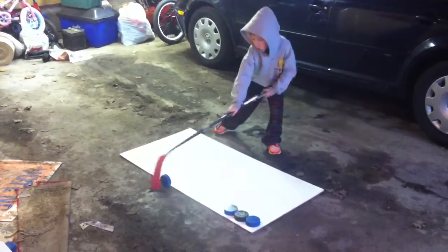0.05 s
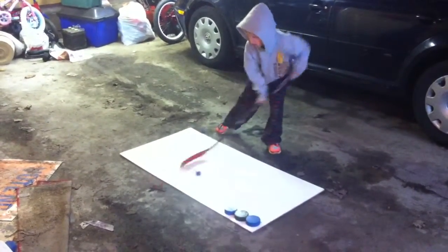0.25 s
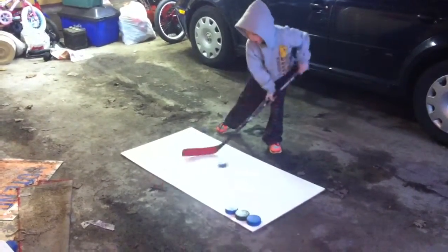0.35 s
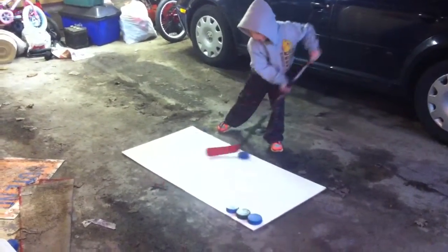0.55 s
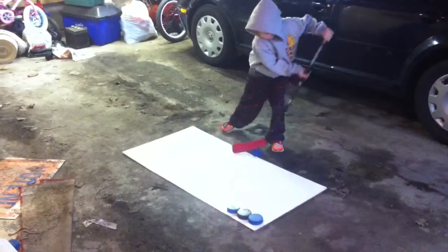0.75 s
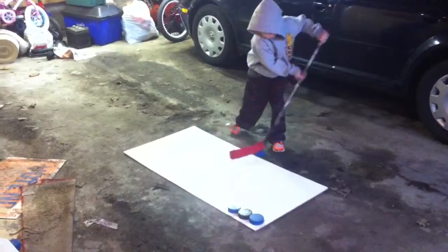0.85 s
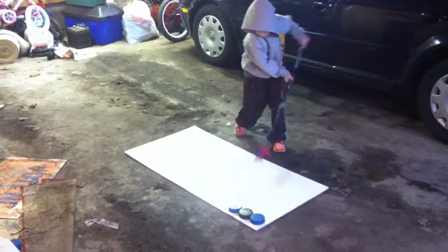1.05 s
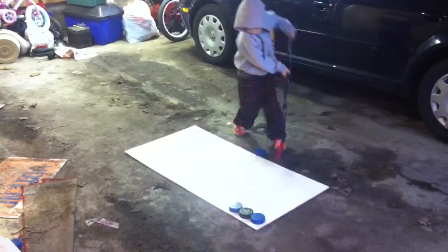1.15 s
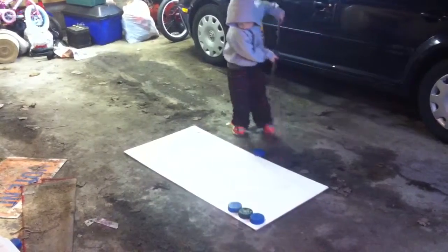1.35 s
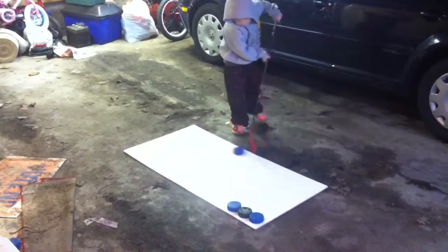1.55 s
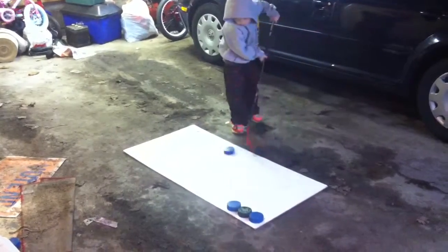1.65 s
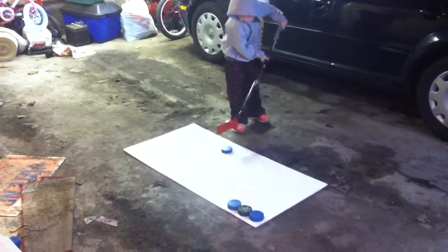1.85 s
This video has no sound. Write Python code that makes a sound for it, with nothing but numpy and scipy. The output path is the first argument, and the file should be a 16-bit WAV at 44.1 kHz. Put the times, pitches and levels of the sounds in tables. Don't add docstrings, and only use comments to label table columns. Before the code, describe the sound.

A hockey stick smacks a puck on a plastic board with a loud double crack and garage echo, shoes shuffle on grit, then a brief scrape and duller knocks; thin, hissy small microphone.

```python
import sys
import numpy as np
from scipy import signal
from scipy.fft import rfft, irfft
from scipy.io import wavfile

SR = 44100
rng = np.random.default_rng(int(sys.argv[2]) if len(sys.argv) > 2 else 0)


def volts(x):
    e = np.asarray(x, float) / 20
    return 10 ** e


def store_pcm(level_fs):
    pcm = np.round(np.clip(level_fs, -1, 1) * 32767).astype(np.int16)
    wavfile.write(sys.argv[1], SR, np.atleast_2d(pcm).T)


N = 83790

# (frequency [Hz], density [dB per Hz])
HISS_COLOUR = [(240, -62), (400, -18.5), (446, -15), (528, -20.5), (879, -14.5), (1060, -14.5),
               (16000, -38.5)]
# (frequency [Hz], density [dB per Hz])
DRONE_COLOUR = [(15, -62), (30, -26), (97, -14), (146, -2), (178, -5), (211, 3), (237, -12), (282, -4),
                (400, -23), (520, -52), (880, -120)]
# (frequency [Hz], time to fall 60 dB [s])
GARAGE_DECAY = [(200, 0.42), (600, .75), (1200, 0.54), (2500, 0.54), (5000, 0.51), (9000, 0.54),
                (14000, 0.17)]
# (time [s], level [dB], extra treble [dB])
SHUFFLE_MOVES = [(0.36, -54, -13), (0.508, -52, -10), (0.662, -55, -14), (0.674, -48.5, -13.5),
                 (0.76, -58, -3), (.86, -58, 3), (.93, -53, 6), (1.034, -49, 5), (1.13, -54, 4),
                 (1.188, -57, -1), (1.216, -55, 1), (1.252, -59.5, -2.5), (1.286, -48.5, 0.5),
                 (1.336, -48.5, -7), (1.358, -43, -5), (1.466, -59, -21), (1.47, -68, 12), (1.64, -66, 0),
                 (1.655, -49, 0), (1.7, -52, 3), (1.725, -51, 6), (1.76, -57, 0), (1.9, -66, -5)]
# (frequency [Hz], density [dB per Hz])
SHUFFLE_COLOUR = [(530, -29), (900, -14), (1390, -16.5), (1790, -9.5), (1950, -9.5), (3300, -7),
                  (4520, -11.5), (10800, -9), (16000, -14.5)]
# (time [s], level [dB])
SKID_LEVEL = [(.38, -70), (.41, -52), (.5, -56), (.6, -49), (.65, -52), (.75, -53.5), (.8, -57), (.85, -54),
              (.92, -70), (1.02, -72), (1.1, -120), (1.46, -120), (1.49, -50), (1.53, -48), (1.6, -59),
              (1.68, -50), (1.72, -51), (1.8, -51), (1.9, -60)]
# (time [s], peak level [dB])
GRIT_FLICKS = [(.8115, -39), (1.6367, -32), (1.6775, -30), (1.7035, -23), (1.7068, -24), (1.712, -33),
               (1.7222, -19), (1.7245, -29), (1.727, -32), (1.733, -32), (1.852, -43)]
# (time [s], level [dB], pitch [Hz])
SOFT_BUMPS = [(.2785, -4, 827), (.2945, -8.5, 880), (.3015, -14, 800), (.3095, -16, 800),
              (.292, -17, 1500), (.3365, -20, 700), (.262, -24, 850), (.324, -12, 1600),
              (1.6227, -41, 9000), (1.6482, -33, 9100), (1.664, -18, 800), (1.4805, -32, 2030),
              (1.488, -33, 2020), (1.483, -35, 2950), (1.49, -36, 2500), (1.496, -36, 3050),
              (1.498, -34, 650), (1.511, -38, 1300), (1.525, -37, 1050), (1.535, -34, 720),
              (1.544, -35, 760), (1.483, -34, 2010), (0.48, -36, 166), (1.77, -36, 580),
              (1.6535, -19, 1980), (1.216, -45.5, 1980), (.364, -14, 840), (.472, -20.5, 670),
              (.511, -33, 780), (.612, -42, 1120), (.635, -39, 800), (.648, -41, 1000), (.668, -41, 900),
              (.703, -41, 825), (.735, -42, 800), (.826, -38, 760), (.833, -43, 700), (.842, -32, 660),
              (0.847, -45, 1420), (.897, -41.5, 600), (1.338, -43, 600), (1.338, -43, 380),
              (1.339, -47, 220), (1.036, -50, 3300), (1.044, -49, 3500), (1.655, -20, 680),
              (1.803, -27, 810), (1.842, -34, 720), (1.724, -27, 780), (1.706, -29, 600), (1.5, -39, 380),
              (1.535, -40, 400), (1.495, -30, 2020), (1.66, -17, 2070)]
# (time [s], level [dB])
DRAG_LEVEL = [(.186, -50), (.19, -24.5), (.205, -39.5), (.25, -37), (.27, -59), (.3, -120), (1.45, -120),
              (1.465, -64), (1.472, -44.5), (1.485, -34), (1.5, -44), (1.54, -41.5), (1.58, -64),
              (1.64, -53), (1.7, -85)]
# (frequency [Hz], density [dB per Hz])
BLADE_GRIT_COLOUR = [(240, -39), (400, -6), (636, -9), (1040, -4.5), (1840, 2.5), (3370, -2), (6540, -8),
                     (13500, -12.5), (16000, -26)]
# (time [s], level [dB])
BLADE_SING = [
    (.18, -14.5),
    (1.46, -13),
    (1.475, -4.5),
    (1.5, -1),
    (1.52, -9),
    (1.58, -12),
    (1.7, -14),
]
# (frequency [Hz], level [dB], time to fall 60 dB [s])
BOARD_MODES = [(187, -29, 0.12), (353, -34, 0.013), (540, -8, 0.063), (691, -3, 0.026), (752.5, -3.5, 0.04),
               (833.5, -4.5, 0.056), (880, -6.5, 0.053), (1167, -10, 0.029)]
# (frequency [Hz], level [dB], time to fall 60 dB [s])
BLADE_MODES = [(1423, 0, 0.017), (1530, -5, 0.011), (1782, 3, 0.014), (2100, 2.5, 0.013), (2180, -3, 0.022),
               (2740, 3.5, 0.0045), (2870, -0.5, .008), (3306, .5, 0.0055), (4120, -4, 0.011),
               (4960, -5.5, 0.011), (6360, -5, 0.0056)]
# (time [s], board thud level [dB], blade knock level [dB], sharp tick level [dB])
CONTACTS = [(0.188, -34, -24, -7.5), (.2535, -36, -19, -28), (.2575, -35, -23, -36),
            (0.2637, -18, -22, -45), (.2737, -15, -8.5, -2.5), (0.2766, -11.5, -8, -50),
            (.2955, -13, -18, -30), (0.621, -44, -42, -60), (1.215, -56, -46.5, -48),
            (1.339, -50, -60, -56), (1.354, -53, -47, -33), (1.652, -19, -32.5, -45),
            (1.6528, -20, -20, -18), (1.665, -24.5, -53, -48), (1.704, -31, -70, -39),
            (1.7222, -28, -41, -21)]

HISS_DB, DRONE_DB = -63, -62.5
GARAGE_DB, GARAGE_SCRAPE_DB, FAR_TICK_DB = 5, -1, -1
FIRST_WALL_S, BUILD_S = 0.001, 0.002
FAR_LOW_HZ = 420
FAR_DAMPING = 0.3
SHUFFLE_GRAINS_PER_S, SHUFFLE_BRIGHT_HZ, SHUFFLE_DB = 9000, 9410, 3
SKID_BUMPS_PER_S, SKID_EDGE_DB = 750, -3
SKID_HISS_HZ, SKID_HISS_S, SKID_HISS_DB = 9000, 0.0025, -13
BUMP_RISE_S, BUMP_FALL_S = 0.002, 0.0036
BUMP_PITCH_LAW = 0.35
DRAG_GRAINS_PER_S, DRAG_RING_HZ, DRAG_RING_S = 5400, 1994, 0.12
MODE_SPREAD_DB = 1.2
SOFT_ABOVE_HZ, SOFT_DULLING, SOFT_MOST_DB = 3000, 0.6, 22
MIC_LOW_HZ, MIC_HIGH_HZ = 190, 14600


def butter(x, order, hz, kind):
    return signal.sosfilt(signal.butter(order, hz, kind, fs=SR, output="sos"), x)


def rms_one(x):
    return x / np.sqrt(np.mean(x ** 2) + 1e-20)


def level(rows):
    s, db = np.transpose(rows)
    return volts(np.interp(np.arange(N) / SR, s, db, left=-120, right=-120))


def at_hz(points, hz):
    table_hz, values = np.transpose(points)
    return np.interp(np.log(hz), np.log(table_hz), values)


def colour(x, spectrum):
    hz = np.maximum(np.arange(N // 2 + 1) * SR / N, 1)
    return rms_one(irfft(rfft(x) * volts(at_hz(spectrum, hz)), N))


def ring(clicks, hz, t60):
    r = volts(-60 / (t60 * SR))
    w = 2 * np.pi * hz / SR
    return signal.lfilter([0, np.sin(w)], [1, -2 * r * np.cos(w), r * r], clicks + 1e-18)


def grains(per_s, uneven_db):
    sizes = volts(uneven_db * np.minimum(rng.exponential(1, N), 5))
    signs = rng.choice([-1, 1], N)
    return sizes * signs * (rng.random(N) < per_s / SR)


def clicks_in_band(s, db, low_hz, high_hz, order):
    clicks = np.zeros(N)
    clicks[(np.array(s) * SR).astype(int)] = -2 * volts(db)
    return butter(clicks + 1e-18, order, [low_hz, high_hz], "band")


def preamp_noise():
    hiss = volts(HISS_DB) * colour(rng.standard_normal(N), HISS_COLOUR)
    drone = volts(DRONE_DB) * colour(rng.standard_normal(N), DRONE_COLOUR)
    return hiss + drone


def garage(x):
    t = np.arange(SR) / SR
    edges = 100 * 2 ** np.arange(0, 7.6, 0.5)
    tail = 0
    for low, high in zip(edges, edges[1:]):
        band = butter(rng.standard_normal(SR), 2, [low, high], "band")
        tail = tail + band * volts(-60 * t / at_hz(GARAGE_DECAY, np.sqrt(low * high)))
    tail = tail * (1 - np.exp(-np.maximum(t - FIRST_WALL_S, 0) / BUILD_S))
    return signal.fftconvolve(x, tail / np.sqrt(np.sum(tail ** 2)))[:N]


def shuffle():
    rows = np.array(SHUFFLE_MOVES)
    grit = colour(grains(SHUFFLE_GRAINS_PER_S, uneven_db=2.5), SHUFFLE_COLOUR)
    high = signal.butter(2, SHUFFLE_BRIGHT_HZ, "high", fs=SR, output="sos")
    top = signal.sosfiltfilt(high, grit)
    body = grit - top
    return level(rows[:, :2]) * volts(SHUFFLE_DB) * (body + top * level(rows[:, ::2]))


def skid():
    knocks = grains(SKID_BUMPS_PER_S, uneven_db=2.0)
    low = sum(volts(db) * ring(knocks, hz, t60 / 2) for hz, db, t60 in BOARD_MODES[1:])
    edge = butter(knocks, 2, [950, 1700], "band")
    hiss = rms_one(ring(rng.standard_normal(N), SKID_HISS_HZ, SKID_HISS_S))
    mix = rms_one(low) + volts(SKID_EDGE_DB) * rms_one(edge) + volts(SKID_HISS_DB) * hiss
    return level(SKID_LEVEL) * mix


def flicks():
    s, db = np.transpose(GRIT_FLICKS)
    return clicks_in_band(s, db, 7500, 12500, order=2)


def bumps():
    out = 0
    for s, db, hz in SOFT_BUMPS:
        t = np.maximum(np.arange(N) / SR - s, 0)
        age = t * (hz / 800) ** BUMP_PITCH_LAW
        swell = (1 - np.exp(-age / BUMP_RISE_S)) * np.exp(-age / BUMP_FALL_S)
        out = out + 2 * volts(db) * swell * np.sin(2 * np.pi * hz * t)
    return out


def drag():
    grit = grains(DRAG_GRAINS_PER_S, uneven_db=1.5)
    song = level(BLADE_SING) * rms_one(ring(grit, DRAG_RING_HZ, DRAG_RING_S))
    return level(DRAG_LEVEL) * (colour(grit, BLADE_GRIT_COLOUR) + song)


def ticks():
    rows = np.array(CONTACTS)
    return 1.28 * clicks_in_band(rows[:, 0], rows[:, -1], 1980, 6680, order=1)


def struck(modes, column, share=1):
    rows = np.array(CONTACTS)
    at = (rows[:, 0] * SR).astype(int)
    spread_db = MODE_SPREAD_DB * rng.standard_normal((len(rows), len(modes)))
    dull = SOFT_DULLING * np.clip(rows[:, column] - rows[:, -1], 0, SOFT_MOST_DB)
    out = 0
    for k, (hz, db, t60) in enumerate(modes):
        octaves_above = max(np.log2(hz / SOFT_ABOVE_HZ), 0)
        clicks = np.zeros(N)
        clicks[at] = volts(rows[:, column] + db - 3.5 - dull * octaves_above + spread_db[:, k])
        out = out + ring(clicks, hz, t60 * share) * (-1) ** k / np.sqrt(share)
    return out


def scene():
    scrapes = drag() + skid()
    near = struck(BOARD_MODES, column=1) + struck(BLADE_MODES, column=2) + ticks()
    far_board = butter(struck(BOARD_MODES[2:], column=1, share=2 * FAR_DAMPING), 2, FAR_LOW_HZ, "high")
    far_blade = struck(BLADE_MODES[:8], column=2, share=FAR_DAMPING)
    wet = garage(volts(GARAGE_DB) * far_board + volts(GARAGE_SCRAPE_DB) * scrapes)
    wet = wet + garage(volts(GARAGE_DB) * far_blade)
    wet = wet + garage(volts(GARAGE_DB + FAR_TICK_DB) * ticks())
    return (near + bumps() + flicks() + scrapes + wet + shuffle())[None]


def roll_off(x):
    return signal.sosfilt(signal.butter(12, 16550, fs=SR, output="sos"), x)


def record(dry):
    rounded = np.tanh(dry)
    thin = butter(rounded, 3, MIC_LOW_HZ, "high")
    thin = butter(thin, 1, MIC_HIGH_HZ, "low")
    return roll_off(thin + preamp_noise())


dry = scene()
out = record(dry)
store_pcm(out)
```